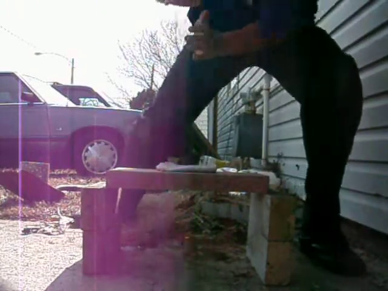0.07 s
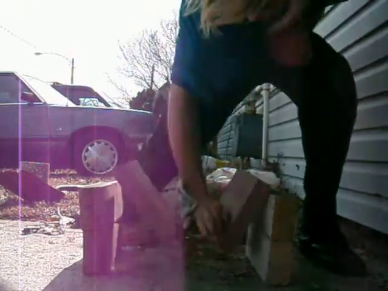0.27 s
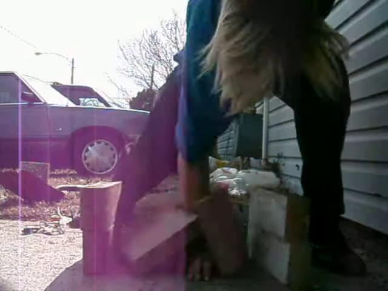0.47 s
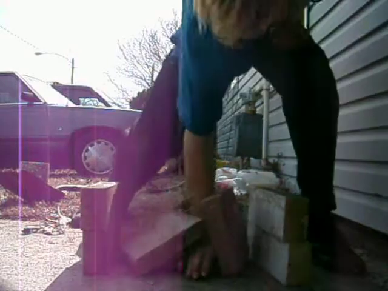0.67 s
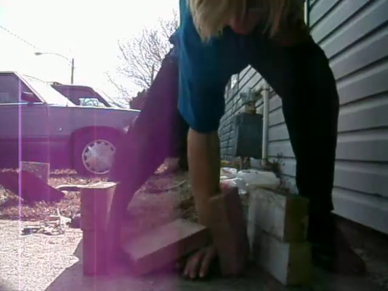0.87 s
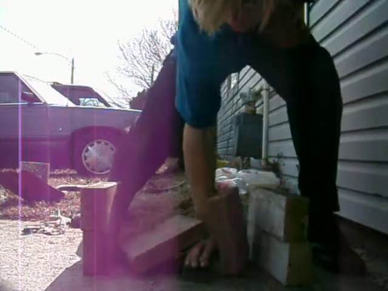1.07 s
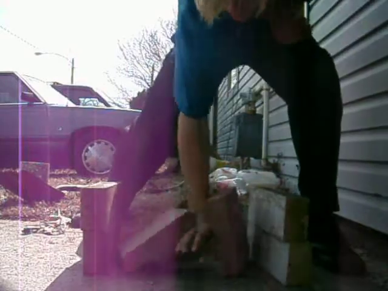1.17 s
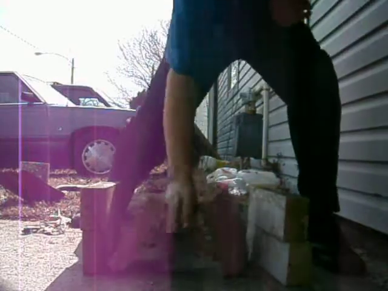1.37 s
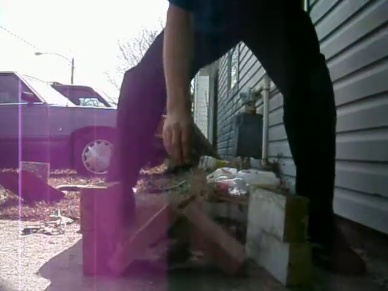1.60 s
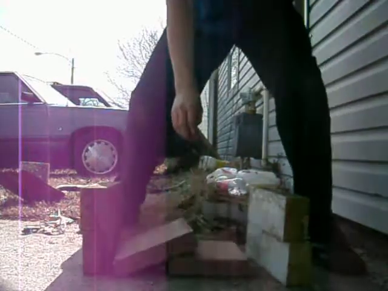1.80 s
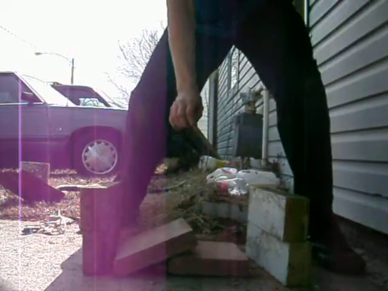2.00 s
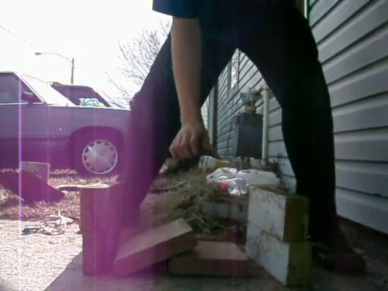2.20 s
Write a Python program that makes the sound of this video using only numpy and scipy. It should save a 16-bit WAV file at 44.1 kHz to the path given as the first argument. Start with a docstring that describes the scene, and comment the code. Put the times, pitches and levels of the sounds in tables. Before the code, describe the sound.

A brick slab snaps under a hand strike with a clipped boom, then its pieces clatter down

```python
"""Snapping a brick slab by hand

A hand snaps a brick slab laid across two supports beside a house wall: fading tones and noise make the boom.
The halves crash, grind as the hand pulls free, then topple flat: knocks ring and crack, noise bands grind.
Soft thumps and rubbing grit lie beneath, over outdoor air, a low rumble and a faint far tone.
A narrow-band microphone close by flattens peaks that go over its limits."""
import sys
import numpy as np
from scipy import signal
from scipy.fft import rfft, irfft
from scipy.io import wavfile

SR = 44100
rng = np.random.default_rng(int(sys.argv[2]) if len(sys.argv) > 2 else 0)


def put_to_file(sound):
    """Save the sound as 16-bit audio at rate SR, in the file named by the first command-line argument."""
    columns = np.atleast_2d(sound).T  # one column per channel
    safe = np.clip(columns, -1, 1)
    whole_steps = np.round(safe * 32767)
    wavfile.write(sys.argv[1], SR, whole_steps.astype(np.int16))


N = 99225
T = np.arange(N) / SR
SHORT = SR // 2  # samples in half a second, the length of one hit
SHORT_T = T[:SHORT]


def amp(db):
    """Turn decibels into a gain."""
    return 10 ** (np.asarray(db) / 20)


def unit(x):
    """Scale to an average strength (rms) of 1."""
    return x / np.sqrt(np.mean(x ** 2))


def curve(rows):
    """Gain over time, drawn through points of (t/s, level/dB)."""
    return amp(np.interp(T, *np.array(rows).T))


def colour(x, points):
    """Reshape the spectrum of x with (f/Hz, level/dB) points, then scale to rms 1."""
    hz, db = np.array(points).T
    f = np.maximum(np.fft.rfftfreq(len(x), 1 / SR), 1)
    gain = amp(np.interp(np.log(f), np.log(hz), db))
    return unit(irfft(rfft(x) * gain, len(x)))


def noise(points, size=N):
    """Random hiss with the given spectrum."""
    return colour(rng.standard_normal(size), points)


def band(hz, width):
    """Noise at rms 1 gathered around one frequency; around 0 Hz it is a slow random wobble."""
    f = np.fft.rfftfreq(N, 1 / SR)
    bell = np.exp(-2 * ((f - hz) / width) ** 2)
    return unit(irfft(rfft(rng.standard_normal(N)) * bell, N))


def fade(t60):
    """Smooth dying-away that drops 60 dB in t60 seconds."""
    return np.exp(-np.log(1000) * SHORT_T / max(t60, 1e-3))


def ring(modes):
    """A struck object sounds as a sum of sine tones, each dying at its own pace."""
    total = np.zeros(SHORT)
    for hz, db, t60 in modes:
        total += np.sqrt(2) * amp(db) * fade(t60) * np.sin(2 * np.pi * hz * SHORT_T)
    return total


def add(out, start, x):
    """Mix x into out, beginning at start seconds."""
    i = int(start * SR)
    out[i:i + len(x)] += x[:max(N - i, 0)]


# spectrum of the outdoor air: [f/Hz, relative level/dB]
AIR_SPECTRUM = [(15, -31), (38, -22), (65, -3), (130, -10), (230, -8), (400, -12.5), (700, -13.5),
                (1150, -14), (1700, -15), (2500, -21.5), (3000, -23.5), (3800, -28), (4400, -24)]
AIR_DB = -34.5
# bands of low rumble: [f/Hz, width/Hz, level/dB before the curve below]
RUMBLE_BANDS = [(43.39, 36, -42), (102.8, 28, -36), (163.7, 61, -43.5), (260, 79, -44)]
# rise and fall of the whole rumble: [t/s, level/dB]
RUMBLE_CURVE = [(0, -1.5), (.2, 2), (.55, 2), (.95, 1.5), (1.35, 1.5), (1.7, -1.5), (2.0, 0.5), (2.25, 0.5)]
# a faint thin tone flickers far off: [t/s, level/dB]
FAR_TONE_CURVE = [(1.8, -62), (1.91, -31.5), (1.97, -45), (2.03, -38.5), (2.08, -47), (2.14, -37.5),
                  (2.25, -36.5)]
FAR_TONE_HZ, FAR_TONE_WIDTH_HZ = 1229.7, 75


def background():
    """Steady outdoor air noise, low rumble from wide bands, and a far tone from one narrow band."""
    air = noise(AIR_SPECTRUM) * amp(AIR_DB)
    rumble = sum(amp(db) * band(hz, width) for hz, width, db in RUMBLE_BANDS)
    far_tone = band(FAR_TONE_HZ, FAR_TONE_WIDTH_HZ) * curve(FAR_TONE_CURVE)
    return air + rumble * curve(RUMBLE_CURVE) + far_tone


# loudness of rubbing grit and clothing: [t/s, level/dB before the flicker]
SCUFF_CURVE = [(0, -41), (.2, -66), (.45, -33), (.6, -32.5), (.85, -32.5), (1.15, -34.5), (1.29, -28.5),
               (1.38, -34.5), (1.55, -39), (1.68, -28), (1.9, -35), (2.25, -35.5)]
# spectrum of the rubbing: [f/Hz, relative level/dB]
SCUFF_SPECTRUM = [(150, -0.5), (300, 0.5), (470, 0.5), (700, -1), (950, -2), (1300, -6), (2100, -7.5),
                  (2380, -3.5), (2520, -0.5), (2800, -7.5), (3300, -14), (3720, -6.5), (4300, -13.5)]
GRIT_PER_S, GRIT_SPREAD_DB = 9000, 1.5  # average number of slips, and how unequal they are
SCUFF_FLICKER_DB, SCUFF_FLICKER_HZ = 3.08, 15


def scuff():
    """Grit and cloth rub in a dense shower of tiny slips at random moments and strengths."""
    slips = rng.random(N) < GRIT_PER_S / SR
    strength = rng.standard_normal(N) * amp(GRIT_SPREAD_DB * rng.exponential(size=N))
    flicker = amp(SCUFF_FLICKER_DB * band(0, SCUFF_FLICKER_HZ))
    return colour(slips * strength, SCUFF_SPECTRUM) * curve(SCUFF_CURVE) * flicker


# dull thumps of hand, feet and settling brick: [t/s, level/dB]
THUMP_HITS = [(0.299, -6.5), (0.321, -7), (.512, -26.5), (.585, -23.5), (0.839, -31.5), (1.093, -30.5),
              (1.307, -26), (1.7076, -18.5), (2.111, -20)]
# tones inside a thump: [f/Hz, relative level/dB, time to fall 60 dB/s]
THUMP_TONES = [(100, -6, .09), (150, -0.5, 0.087), (265, -9.5, 0.068)]
# spectrum of a thump's noise: [f/Hz, relative level/dB]
THUMP_SPECTRUM = [(30, -16), (100, -2), (260, -9.5), (600, -20.5), (2000, -46)]
THUMP_NOISE_DB, THUMP_T60_S = -3, 0.068  # noise relative to the hit's level, and its fade


def thumps():
    """Soft, heavy contacts: low tones and a dull puff of noise die away together."""
    out = np.zeros(N)
    for start, db in THUMP_HITS:
        puff = amp(THUMP_NOISE_DB) * noise(THUMP_SPECTRUM, size=SHORT) * fade(THUMP_T60_S)
        add(out, start, amp(db) * (ring(THUMP_TONES) + puff))
    return out


# the halves grind against each other as the hand pulls free: [t/s, level/dB]
GRIND_CURVE = [(1.05, -65), (1.11, -51), (1.16, -51), (1.205, -38), (1.24, -33), (1.285, -36),
               (1.33, -40.5), (1.39, -60), (1.5, -80)]
# resonances of the ground brick: [f/Hz, width/Hz, relative level/dB]
GRIND_BANDS = [(677, 120, -10), (1529, 110, -0.5), (2474, 90, 1.5), (3660, 78, -10)]


def grind():
    """Rough faces rub and excite the resonances of the brick, heard as bands of noise."""
    rub = sum(amp(db) * band(hz, width) for hz, width, db in GRIND_BANDS)
    return rub * curve(GRIND_CURVE)


TAIL_DB, TAIL_T60_S = -14, 0.23


def burst(points, t60):
    """Noise that dies fast, with a weaker, longer tail scattered by wall and ground."""
    return noise(points, size=SHORT) * np.hypot(fade(t60), amp(TAIL_DB) * fade(TAIL_T60_S))


# brick meets brick or concrete: [t/s, body level/dB, body f/Hz, crack level/dB,
# low ring level/dB, low ring f/Hz, high ring level/dB]
CONTACTS = [ (0.2192, -6.5, 746, -0.5, -6.5, 2518, -35), (0.2337, -11.5, 786, -14.5, -3.5, 2567, -24),
            (.296, -1.5, 808, -1.5, -13, 2507, -9), (0.303, -4.5, 805, 3, -7.5, 2613, -26),
            (.314, 2.5, 908, 0.5, -13, 2494, -5), (.323, -19, 872, -7, -2.5, 2515, -2),
            (.334, -10, 600, 1, 0.5, 2524, -8.5), (.347, -7, 772, 0, -2, 2500, -26),
            (.363, -11, 760, -11.5, -19.5, 2530, -31), (0.3758, -14.5, 653, -13, -14.5, 2621, -15.5),
            (0.389, -15.5, 692, -18, -0.5, 2501, -25), (0.401, -5.5, 768.3, -9, -8.5, 2506, -27),
            (.4158, -12.5, 681, -7.5, -5, 2480, -3), (.431, -19.5, 750, -55, -23, 2400, -42),
            (.457, -29, 754, -50, -23, 2525, -15.5), (1.092, -39, 710, -40, -32, 2520, -59),
            (1.196, -40, 700, -43.5, -22, 2475, -39), (1.208, -34.5, 680, -23, -38, 2575, -36.5),
            (1.247, -45.5, 697.7, -47, -27.5, 2500, -44), (1.277, -22.5, 674, -19.5, -19, 2448, -40),
            (1.305, -31.5, 700, -38.5, -22.5, 2467, -35), (1.5687, -8, 545.6, -6.5, 2.5, 2496, -42.5),
            (1.5845, -9.5, 663, -16, -26, 2560, -25), (1.593, -29, 660, -25, -2.5, 2505, -34),
            (1.607, -14.5, 697.6, -14.5, -24, 2555, -27), (1.624, -20.5, 700, -12.5, -7.5, 2522, -29),
            (1.6336, -16, 735, -29, -27, 2546, -27.5), (1.642, -24, 550, -24.5, -12, 2508, -31),
            (1.681, -38, 701, -45, -28.5, 2516, -31.5), (1.706, -34, 708, -32, -26, 2546, -29),
            (1.723, -40.5, 700, -33, -18.5, 2518, -27), (1.7333, -11, 801, 3, 3, 2495, -8),
            (1.752, -17, 774, -6, 2.5, 2489, -22), (1.765, -21.5, 750, -4, -4, 2484, -30),
            (1.7722, -22.5, 800, -6.5, -11, 2652, -10.5), (1.777, -15, 746.7, -4, -11, 2575, -16),
            (1.783, -16.5, 860, -6.5, -12, 2459, -29), (1.8029, -22, 749.2, -16.5, -13, 2570, -31),
            (1.8115, -21, 786, -18, -36, 2528, -37), (1.841, -41, 751, -47, -24.5, 2496, -49)]
# spectrum of the noise in a knock's hollow body: [f/Hz, relative level/dB]
BODY_SPECTRUM = [(50, -10), (150, -8.5), (300, -5), (480, -6.5), (740, -1.5), (1000, -7), (1600, -20.5),
                 (4000, -42)]
# spectrum of the noise in its dry crack: [f/Hz, relative level/dB]
CRACK_SPECTRUM = [(150, -28), (600, -8.5), (1000, -0.5), (1400, 3), (1900, -2.5), (2500, 3), (3100, -12.5),
                  (3700, -5), (4400, -16)]
# tones in the crack: [f/Hz, relative level/dB, time to fall 60 dB/s]
CRACK_TONES = [(999, -15, 0.031), (1228, -19.5, 0.13), (1298, -15, .1), (1527, -14.5, 0.12),
               (1638.4, -11, 0.054), (1865, -23, 0.14), (2020, -17, 0.11)]
# tones in the high clink: [f/Hz, relative level/dB, time to fall 60 dB/s]
HIGH_RING_TONES = [(3712, 2, 0.089), (3666, -6.5, 0.055)]
BODY_NOTE_DB, BODY_NOTE_T60_S = -1.5, 0.063  # the note's level is relative to the body
BODY_T60_S, CRACK_T60_S, LOW_RING_T60_S = 0.043, 0.05, 0.1
RING_RISE_S = 0.0018  # time constant of the soft start of both rings
TWIN_HZ, TWIN_DB = 41.7, -11.5  # a second tone this far above the low ring makes it beat
RING_SCATTER, RING_SCATTER_HZ = 0.33, 110


def knocks():
    """Each contact has a hollow note, dry crack and clink, and feeds a low ring led by the strongest."""
    out, rise = np.zeros(N), 1 - np.exp(-SHORT_T / RING_RISE_S)
    power, weighted_hz = np.full(N, 1e-12), np.zeros(N)  # the tiny power avoids dividing by zero
    crack_tones, clink = ring(CRACK_TONES), rise * ring(HIGH_RING_TONES)
    feed = rise * fade(LOW_RING_T60_S)
    for start, body_db, body_hz, crack_db, low_db, low_hz, high_db in CONTACTS:
        body = ring([(body_hz, BODY_NOTE_DB, BODY_NOTE_T60_S)]) + burst(BODY_SPECTRUM, BODY_T60_S)
        crack = crack_tones + burst(CRACK_SPECTRUM, CRACK_T60_S)
        add(out, start, amp(body_db) * body + amp(crack_db) * crack + amp(high_db) * clink)
        low_power = (amp(low_db) * feed) ** 2
        add(power, start, low_power)
        add(weighted_hz, start, low_hz * low_power)
    # the pitch is an average in which stronger contacts count for more
    phase = 2 * np.pi * np.cumsum(weighted_hz / power) / SR
    # wall and ground scatter the ring, so that it wavers
    scatter = band(0, RING_SCATTER_HZ) * np.sin(phase) + band(0, RING_SCATTER_HZ) * np.cos(phase)
    twin = amp(TWIN_DB) * np.sin(phase + 2 * np.pi * TWIN_HZ * T)
    low_ring = np.sqrt(2 * power) * (np.sin(phase) + RING_SCATTER * scatter + twin)
    return out + low_ring


# tones of slab and supports under the hand: [f/Hz, relative level/dB, time to fall 60 dB/s]
SLAB_TONES = [(131.2, -13, 0.18), (188.3, -1, 0.1), (271.4, -2, 0.15), (318.6, -1, .12), (523.6, -9, 0.17),
              (770, -3, 0.071)]
# spectrum of the noise in the blow: [f/Hz, relative level/dB]
STRIKE_SPECTRUM = [(40, -13.5), (120, -3.5), (300, -3), (550, -8.5), (1000, -16), (2200, -22), (4200, -38)]
STRIKE_S, STRIKE_DB, STRIKE_NOISE_DB, STRIKE_T60_S = 0.2183, 1.5, 5.5, 0.14


def strike():
    """The hand drives the slab and its supports into a deep boom of low tones and noise."""
    out = np.zeros(N)
    tones = amp(STRIKE_DB) * ring(SLAB_TONES)
    blow = amp(STRIKE_NOISE_DB) * noise(STRIKE_SPECTRUM, size=SHORT) * fade(STRIKE_T60_S)
    add(out, STRIKE_S, tones + blow)
    return out


def scene():
    """Everything added together at the one microphone."""
    return (background() + scuff() + grind() + thumps() + knocks() + strike())[None]


SLOW_RATE_HZ, TOP_HZ = 8000, 16000
INPUT_CEILING, OUTPUT_CEILING, OFFSET = 0.68, 0.71, -0.018  # full scale is 1


def record(dry):
    """Slow sampling dulls the sound and clips it; the rebuilt wave overshoots, clips again and rasps."""
    slow = signal.resample_poly(dry, SLOW_RATE_HZ, SR, axis=-1) + OFFSET
    held = np.clip(slow, -INPUT_CEILING, INPUT_CEILING)
    # a long, steep filter rebuilds the wave up to half the slow rate
    steep = signal.firwin(14113, 1 / 441, window=("kaiser", 9))
    rebuilt = signal.resample_poly(held, SR, SLOW_RATE_HZ, axis=-1, window=steep)[:, :N]
    clipped = np.clip(rebuilt, -OUTPUT_CEILING, OUTPUT_CEILING)
    low_pass = signal.ellip(10, 0.1, 80, TOP_HZ, fs=SR, output="sos")
    return signal.sosfilt(low_pass, clipped)


dry = scene()
out = record(dry)
put_to_file(out)
```